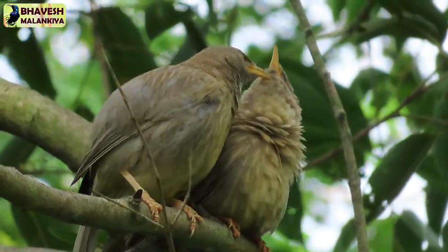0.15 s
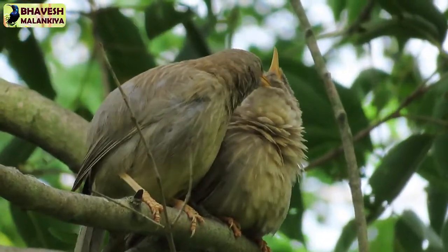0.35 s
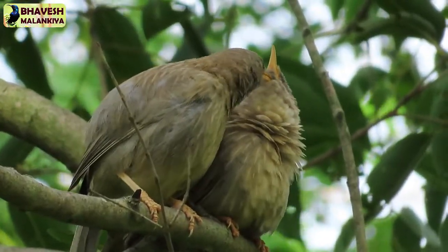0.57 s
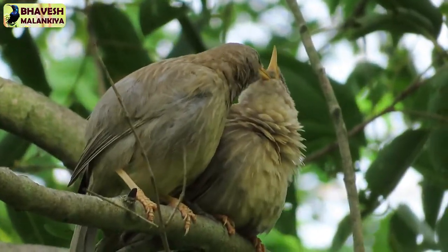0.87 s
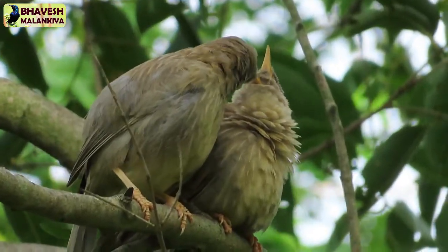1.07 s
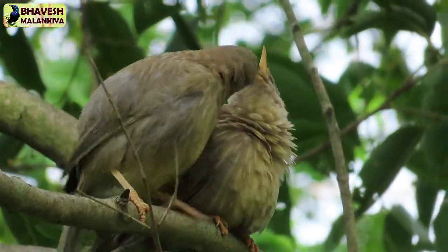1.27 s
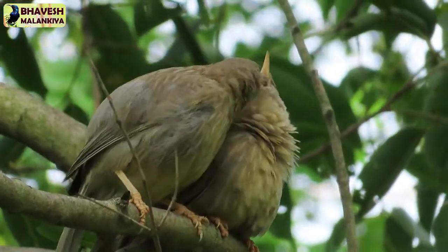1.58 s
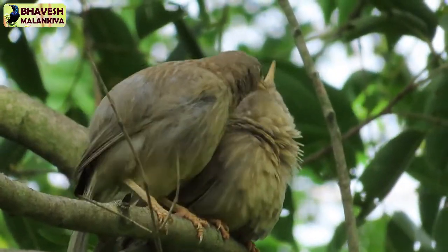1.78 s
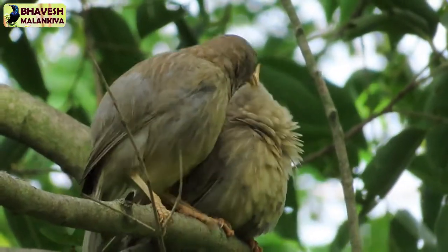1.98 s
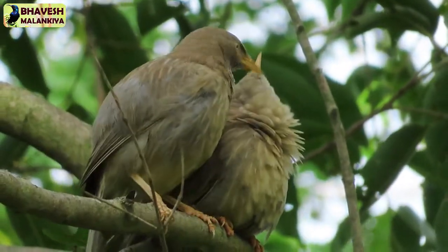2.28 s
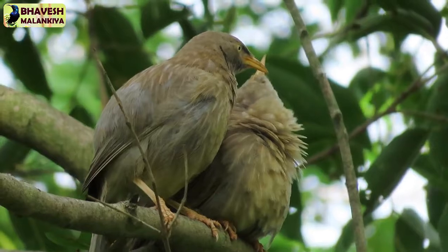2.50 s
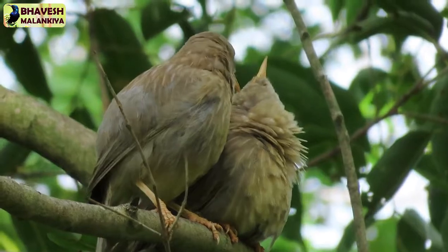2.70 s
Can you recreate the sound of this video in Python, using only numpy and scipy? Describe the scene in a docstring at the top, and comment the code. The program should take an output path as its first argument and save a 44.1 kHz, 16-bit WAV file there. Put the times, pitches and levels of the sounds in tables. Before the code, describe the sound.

Raspy, fluttering bird chatter from a leafy tree, strongest around the first second, quieter in the middle, then a sharp squawk at two seconds and a weak ending, over faint hiss and uneven low air rumble bumping the microphone.

```python
"""A steady hiss and a rumble that swells and sinks, both coloured noise, run throughout.
Softer babbler slurs and churrs come from the start, some as lower strands under the near calls,
with thin high pipes. Soon near babblers rasp in a leafy tree: sliding tones shaken by a fast flutter,
scattered by foliage. A faint noise-band buzz rises behind them, low pressure swings bump the
microphone, and a faint trill of beating noise comes in during the second half."""
import sys
import numpy as np
from scipy import signal
from scipy.fft import rfft, irfft
from scipy.io import wavfile
from scipy.ndimage import uniform_filter1d

SR = 44100
rng = np.random.default_rng(int(sys.argv[2]) if len(sys.argv) > 2 else 0)


def to_wav(sig):
    """Store sig (one row per channel, or 1-D mono) as 16-bit WAV at the path in sys.argv[1].

    Samples outside -1..1 are clipped; the rate is SR.
    """
    pcm = np.clip(np.atleast_2d(sig), -1, 1) * 32767
    pcm = np.round(pcm).astype(np.int16)
    wavfile.write(sys.argv[1], SR, pcm.T)  # frames by channels


N = 125685  # length in samples

# the voice, shared by soft notes and near calls; rasp scales the swing, wander and jitter
FLUTTER_HZ, FLUTTER_WANDER, FLUTTER_DEPTH = 222, .07, .6  # mean rate, relative drift, loudness depth
SWING_HZ, JITTER_HZ, JITTER_RATE_HZ = 476, 240, 65  # pitch swing, random pitch spread, its bandwidth
SHIMMER = .16  # random loudness spread
CLEAN_RASP, THROAT_TOP_HZ = 0.15, 5280  # overtones fade below this rasp and above this frequency
TWIN_RATIO, TWIN_DB, LOCK_DB = .75, -5.5, -26  # lower tone: pitch ratio, level at full rasp, drop-out level


def amp(db):
    """Decibels to gain."""
    return 10 ** (np.asarray(db) / 20)


def unit(x):
    """Scales to rms 1."""
    return x / np.sqrt(np.mean(x ** 2) + 1e-20)


def over_hz(points, hz):
    """Reads a spectrum on a log-frequency axis."""
    f, value = np.transpose(points)
    return np.interp(np.log(hz + 1), np.log(f), value)


def over_time(points):
    """Reads a curve at every sample."""
    return np.interp(np.arange(N) / SR, *np.transpose(points))


def add(mix, s, sound):
    """Mixes a sound in at a time in seconds."""
    part = mix[..., max(round(s * SR), 0):][..., :sound.shape[-1]]
    part += sound[..., :part.shape[-1]]


def band(centre_hz, width_hz):
    """Noise in a bell-shaped band; around zero it is a slow wobble."""
    hz = np.fft.rfftfreq(N, 1 / SR)
    bell = np.exp(-.5 * ((hz - centre_hz) / width_hz) ** 2)
    return unit(irfft(rfft(rng.standard_normal(N)) * bell, N))


def air(spectrum):
    """Stereo noise of a given colour with gently drifting patches."""
    # Likeness of the two channels. Each row: frequency in Hz, correlation from -1 to 1.
    likeness = [(30, 0.99), (200, 0.85), (380, 0.25), (700, 0.78), (1300, 0.47), (2400, 0.64), (4400, 0.21),
                (8100, 0.18), (10400, -0.51)]
    patch_db = 1.66
    frames, hz = N // 512 + 5, np.fft.rfftfreq(2048, 1 / SR)
    a, b, c, d, patches = rng.standard_normal((5, len(hz), frames))
    # smooth over frequency, then over time
    patches = unit(uniform_filter1d(uniform_filter1d(patches, size=20, axis=0), size=7, axis=1))
    same = np.clip(over_hz(likeness, hz), -1, 1)[:, None]
    left = a + 1j * b
    right = same * left + np.sqrt(1 - same ** 2) * (c + 1j * d)
    z = np.array([left, right]) * amp(over_hz(spectrum, hz)[:, None] + patch_db * patches)
    return unit(signal.istft(z, nperseg=2048, noverlap=1536)[1][:, :N])


def hiss():
    """Steady outdoor noise at a fixed level."""
    # Colour of the hiss. Each row: frequency in Hz, relative density in dB.
    colour = [(400, 0), (580, -6.5), (760, -3), (1000, -7.5), (1400, -13), (2500, -9.5), (4000, -18),
              (5500, -26), (7300, -22.5), (8900, -30.5), (9700, -22.5), (10450, -13), (11300, -32.5),
              (15000, -39)]
    return amp(-36) * air(colour)


def rumble():
    """Low air noise whose level follows a curve."""
    # Colour of the rumble. Each row: frequency in Hz, relative density in dB.
    colour = [(15, -13), (30, -17), (60, 2), (125, -2), (170, -3), (230, -15), (320, -21), (600, -78)]
    # Swell of the rumble. Each row: time in seconds, level in dB.
    level = [(.15, -33), (.35, -25), (1.15, -26.5), (1.5, -30), (1.9, -27.5), (2.5, -29)]
    return amp(over_time(level)) * air(colour)


def unrest():
    """The chance in one voice: drift of the flutter, pitch jitter, loudness shimmer."""
    return np.array([band(0, FLUTTER_HZ / 2), band(0, JITTER_RATE_HZ), band(0, 2 * FLUTTER_HZ)])


def voice(t, hz, level_db, rasp, chance):
    """A tone shaken by an uneven flutter and joined by a lower twin tone, the more so the raspier."""
    # Overtones of the voice. Each row: multiple of the main tone, level against it in dB.
    partials = [(1 / 2, -31.5), (3 / 2, -28.5), (2, -24)]
    drift, jitter, shimmer = chance[:, (t * SR).astype(int) % N]
    flutter = 2 * np.pi * np.cumsum(FLUTTER_HZ * (1 + FLUTTER_WANDER * rasp * drift)) / SR
    shaken_hz = hz + rasp * (SWING_HZ * np.cos(flutter + 1) + JITTER_HZ * jitter)
    phase = 2 * np.pi * np.cumsum(shaken_hz) / SR

    twin = np.sin(2 * np.pi * np.cumsum(TWIN_RATIO * hz + rasp * JITTER_HZ * drift) / SR)
    # the twin grows with rasp and recedes in calls louder than LOCK_DB
    twin_gain = amp(TWIN_DB) * rasp / (1 + amp(level_db - LOCK_DB) ** 2)

    shake = np.minimum(2 * rasp, 1)
    beat = 1 + shake * (FLUTTER_DEPTH * np.cos(flutter) + SHIMMER * shimmer)
    beat = beat / np.sqrt(1 + shake ** 2 * (FLUTTER_DEPTH ** 2 + SHIMMER ** 2) / 2)  # offsets added power

    overtones = sum(amp(db) * np.sin(k * phase) / (1 + (k * hz / THROAT_TOP_HZ) ** 20)
                    for k, db in partials)
    tone = np.sin(phase) + np.minimum(rasp / CLEAN_RASP, 1) * overtones + twin_gain * twin
    ends = np.clip(np.minimum(t - t[0], t[-1] - t) / 0.0017, 0, 1)
    return np.sqrt(2) * amp(level_db) * ends * beat * tone


def swelling_note(chance, start, length, first_hz, middle_hz, last_hz, level_db, rasp):
    """One note that swells and fades unevenly along a bent glide."""
    uneven_db = 3.5
    u = np.linspace(0, 1, max(round(length * SR), 64))
    glide = np.polyfit([0, .5, 1], [first_hz, middle_hz, last_hz], 2)
    effort_db = level_db + uneven_db * band(0, JITTER_RATE_HZ)[:len(u)]
    swell = np.sqrt(4 * u * (1 - u))
    return start, swell * voice(start + u * length, np.polyval(glide, u), effort_db, rasp, chance)


def soft_notes():
    """Softer slurs and churrs, some of them lower strands under the near calls, and thin high pipes."""
    # Softer whistled slurs. Each row: start in seconds, length in seconds,
    # first, middle and last pitch in Hz, level in dB.
    slurs = [ (0.017, 0.061, 3680, 3520, 3520, -49), (0.073, 0.028, 2650, 3175, 3400, -42),
             (0.164, 0.032, 2950, 3105, 3080, -35.5), (.183, 0.084, 2530, 2360, 2490, -37.5),
             (0.189, 0.057, 3500, 3460, 2650, -38.5), (0.281, .15, 2000, 1840, 1436, -37.5),
             (1.171, 0.17, 3043, 2370, 1990, -44), (1.338, 0.23, 2550, 2735, 2985, -48),
             (1.813, 0.063, 3750, 3100, 2350, -39.5), (1.833, .09, 2200, 2185, 2650, -43.5),
             (2.091, 0.071, 2550, 2274, 1455, -35.5), (2.134, 0.14, 2300, 2103, 2056, -43.5),
             (2.322, 0.075, 2900, 2330, 2260, -45), (2.368, .055, 2850, 3110, 2780, -42),
             (2.403, .06, 3620, 4010, 3430, -41.5), (2.668, 0.034, 1700, 1983, 2050, -43.5),
             (2.778, 0.079, 4750, 3890, 2920, -37.5), ]
    # Thin high pipes. Each row: start in seconds, length in seconds,
    # first, middle and last pitch in Hz, level in dB.
    pipes = [(0.134, 0.024, 5870, 5660, 5500, -49), (0.336, 0.1, 6150, 6400, 6230, -51),
             (1.9, .045, 6150, 5990, 6520, -49.5), (2.074, 0.076, 6400, 6400, 6530, -52)]
    # Softer rasping churrs. Each row: start in seconds, length in seconds, pitch in Hz, level in dB.
    churrs = [(0.206, 0.047, 3700, -42.5), (0.472, .037, 2400, -31.5), (0.523, 0.13, 2456, -29.5),
              (1.275, .038, 1468, -43.5), (1.712, 0.068, 3234, -39.5), (1.82, 0.29, 2612, -35),
              (2.05, .14, 3000, -37), (2.267, 0.13, 2750, -42), (2.725, .11, 3850, -43.5)]
    slur_rasp, churr_rasp = .16, .55
    out, chance = np.zeros(N), unrest()
    for row in slurs + pipes:
        add(out, *swelling_note(chance, *row, slur_rasp))
    for start, length, hz, db in churrs:
        add(out, *swelling_note(chance, start, length, hz, hz, hz, db, churr_rasp))
    return out


def near_birds():
    """The loud calls, each following its own pitch, effort and rasp."""
    # One list of points per call. Each row: time in seconds, pitch in Hz, level in dB, rasp (about 0 to 1).
    calls = [
        [(.263, 3068, -29, 1), (.283, 2706, -30, 0.63), (.289, 2066, -32, 0.53), (.302, 2016, -25.5, 0.15),
         (.307, 2850, -30.5, 0.1), (.319, 2983, -27.5, 0.09), (.328, 1952, -29, 0.07), (.333, 2888, -30, 0.27),
         (.347, 2673, -22.5, 0.21), (.353, 2133, -34, 0.35), (.369, 2430, -27, 0.4), (.375, 2010, -30, 0.23),
         (.404, 1935, -32, 0.2)],
        [(.513, 3340, -26.5, 0.63), (.523, 2926, -27.5, 0.68), (.534, 2777, -26.5, .5),
         (.559, 2600, -28.5, 0.53), (.576, 3076, -26, 0.44), (.585, 2820, -20.5, .25), (.602, 2767, -19, 0.03),
         (.612, 2425, -27, 0.68), (.624, 2767, -26.5, .35), (.655, 2536, -35, 0.45), (.73, 2660, -46.5, 0.35)],
        [(.754, 3290, -25, 0.69), (.785, 2775, -20.5, 0.44), (.81, 2714, -16.5, 0.56),
         (.832, 2736, -19.5, 0.47), (.835, 3158, -14, 0.1), (.864, 3292, -12, 0.01), (.869, 3160, -9, 0.22)],
        [(.966, 2630, -26, 0.15), (.975, 2250, -27.5, 0.3), (.988, 2956, -19.5, 0.13), (.997, 2380, -18, 0.02),
         (1.004, 3070, -16.5, 0.12), (1.016, 2638, -14.5, 0.09), (1.042, 2384, -17.5, 0.09),
         (1.056, 2450, -24, 0.27)],
        [(1.058, 2330, -35, 0.56), (1.07, 2936, -21, 0.23), (1.084, 3340, -26, 0), (1.092, 2840, -24, 0.11),
         (1.101, 3500, -18.5, 0.1), (1.113, 2950, -16, 0.13), (1.133, 2815, -22, 0.24), (1.141, 3067, -17, 0.1),
         (1.15, 2548, -19, 0.16), (1.17, 2423, -31, 0.14)],
        [(1.925, 3000, -34, 0.76), (1.971, 3500, -31.5, 0.86), (1.973, 4420, -26, 0),
         (1.978, 3590, -16.5, 0.76), (1.99, 3470, -36, 0.9), (1.996, 3230, -16, 0.16), (2.007, 2995, -27, 0.45),
         (2.016, 3345, -19.5, 0.07), (2.023, 2833, -18.5, 0.24), (2.03, 3560, -18.5, 0), (2.042, 3443, -21, 0),
         (2.07, 2967, -20, 0.41), (2.098, 2484, -27.5, 0)],
        [(2.465, 2696, -36, 1), (2.495, 2800, -35, 0.71), (2.51, 3050, -30.5, 0), (2.545, 3545, -36.5, 1.1),
         (2.568, 2842, -22, 0.23), (2.589, 2450, -25.5, 0.03), (2.596, 2953, -36, 0.85),
         (2.65, 2960, -37.5, 0.2)],
    ]
    out, chance = np.zeros(N), unrest()
    for call in calls:
        s, *controls = np.transpose(call)
        s = np.sort(s)
        t = np.arange(s[0], s[-1], 1 / SR)
        hz, level_db, rasp = (np.interp(t, s, c) for c in controls)
        add(out, s[0], voice(t, hz, level_db, rasp, chance))
    return out


def foliage(x, wet_db):
    """Direct sound, a few echoes from trunks and ground, and a diffuse tail from the leaves."""
    # Echoes against the direct sound. Each row: delay in seconds, level in dB.
    echoes = [(.0065, -9), (.021, -12), (.055, -19), (.113, -26)]
    leaves_t60_s, right_db = .25, .6  # decay by 60 dB; level of right above left
    t = np.arange(SR // 2) / SR
    tail = rng.standard_normal((2, len(t))) * amp(-60 * t / leaves_t60_s) * np.minimum(t / 0.018, 1)
    tail += .5 * tail[::-1]  # each side leaks into the other
    tail *= amp(wet_db) / np.linalg.norm(tail, axis=1, keepdims=True)
    tail[:, 0] += 1  # the direct sound
    for delay, db in echoes:
        add(tail, delay, amp([db]))
    balance = amp([[-right_db / 2], [right_db / 2]])
    return signal.fftconvolve(x[None], tail, axes=1)[:, :N] * balance


def buzz():
    """A thin high buzz behind the calls: a noise band, independent left and right."""
    # Swell of the buzz. Each row: time in seconds, level in dB.
    level = [(.3, -63), (.8, -50.5), (1.2, -68), (1.9, -51.5), (2.3, -60)]
    centre_hz, width_hz = 7070, 720
    return amp(over_time(level)) * np.array([band(centre_hz, width_hz) for _ in range(2)])


def bumps():
    """Brief low pressure swings that reach the two microphone ports a little out of step."""
    # Bumps of air on the microphone. Each row: centre in seconds, pitch in Hz, envelope peak in dB.
    table = [(0.383, 95, -17), (0.776, 70.5, -10), (.825, 77, -15.5), (1.168, 91, -14),
             (1.298, 96.5, -16.5), (1.412, 64.5, -18.5), (1.604, 71.4, -10), (1.899, 78, -12),
             (2.002, 115, -9.5)]
    cycles, skew_rad = .7, .5  # envelope half-width in cycles, largest phase offset per side
    out, t = np.zeros((2, N)), np.arange(-SR // 20, SR // 20) / SR
    chances = rng.uniform(-0.85, 1, (len(table), 2))
    for (s, hz, db), (turn, skew) in zip(table, chances):
        phase = np.pi * turn + skew_rad * skew * np.array([[1], [-1]])
        swell = np.exp(-(t * hz / cycles) ** 2)
        add(out, s + t[0], amp(db) * swell * np.cos(2 * np.pi * hz * t + phase))
    return out


def trill():
    """A faint distant trill: a noise band beating at an unsteady rate."""
    # Swell of the trill. Each row: time in seconds, level in dB.
    level = [(1.58, -66), (1.63, -48), (1.98, -50), (2.15, -58)]
    centre_hz, width_hz = 4970, 1400
    rate_hz = 52 + 20 * band(0, 23)
    beat = 1 + 0.44 * np.cos(2 * np.pi * np.cumsum(rate_hz) / SR)
    return amp(over_time(level)) * beat * band(centre_hz, width_hz)


def scene():
    """Birds in the tree over hiss, rumble and bumps; the soft notes carry more foliage tail."""
    birds = foliage(soft_notes(), -11) + foliage(near_birds(), -17.5)  # tail levels in dB
    return hiss() + rumble() + birds + buzz() + bumps() + trill()


def record(dry):
    """The recorder's band limit, a steep low-pass, with soft ends."""
    edge_hz = 15730
    t = np.arange(N) / SR
    ends = np.clip(np.minimum(t, t[-1] - t) / .003, 0, 1)
    low_pass = signal.firwin(511, edge_hz, window=("kaiser", 9), fs=SR)
    return signal.oaconvolve(dry * ends, low_pass[None], "same")


dry = scene()
out = record(dry)
to_wav(out)
```